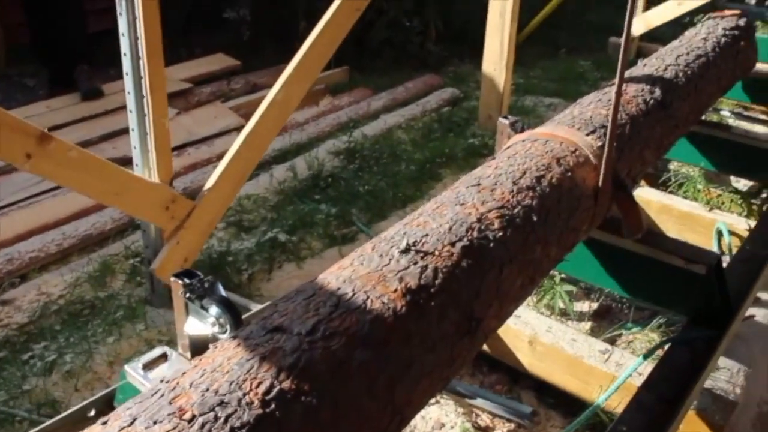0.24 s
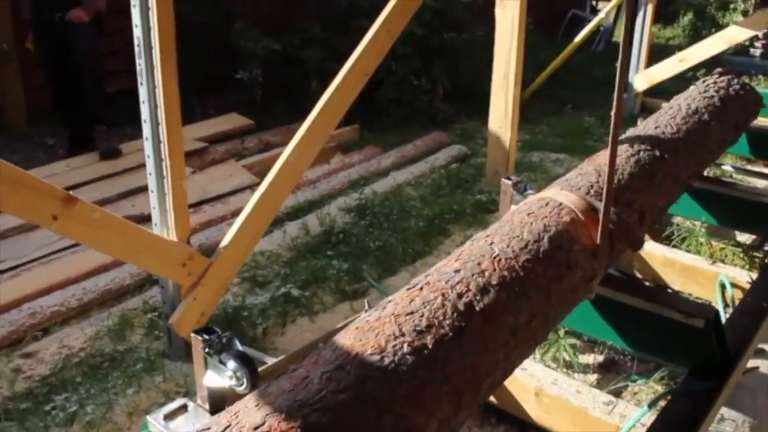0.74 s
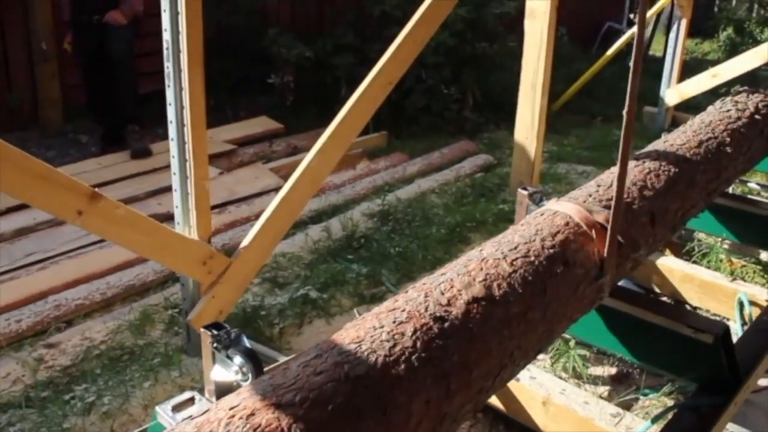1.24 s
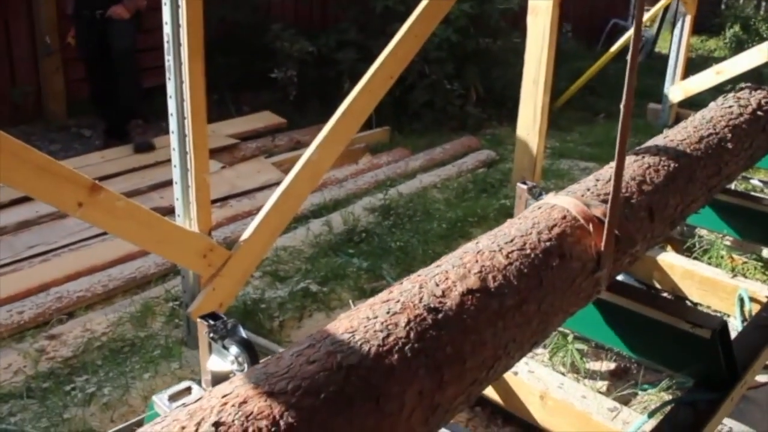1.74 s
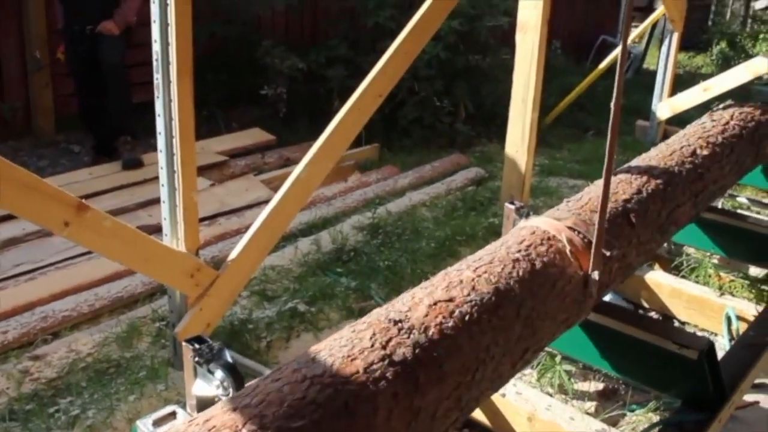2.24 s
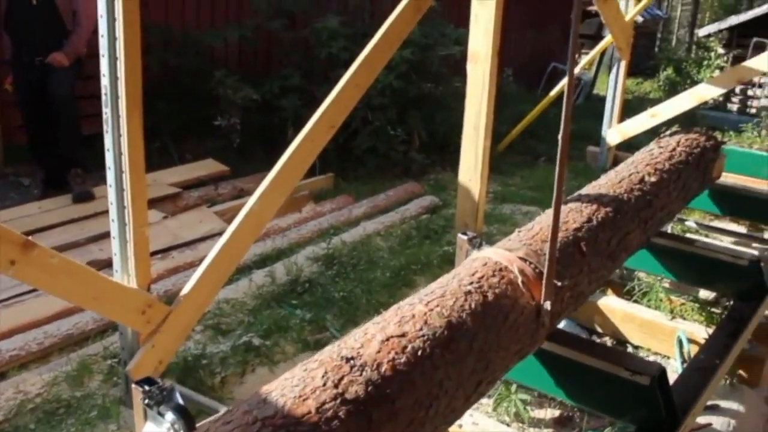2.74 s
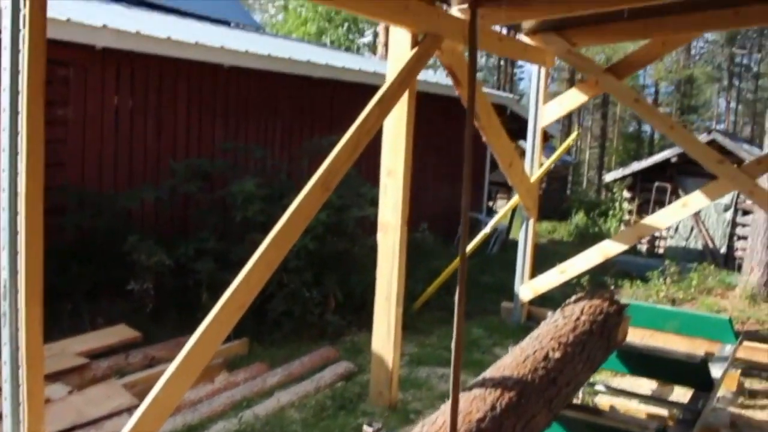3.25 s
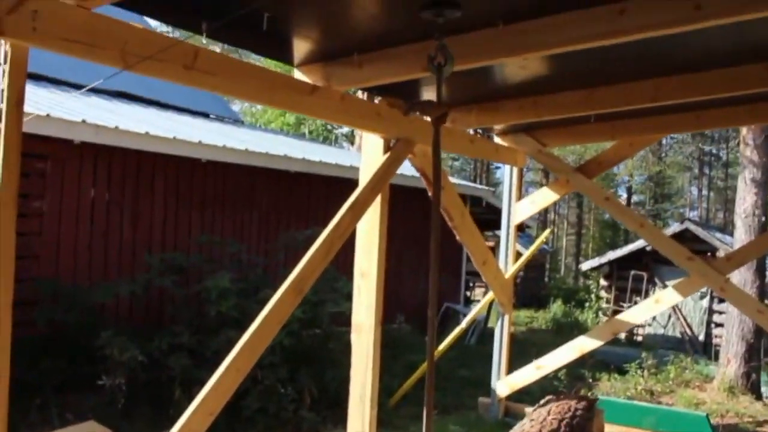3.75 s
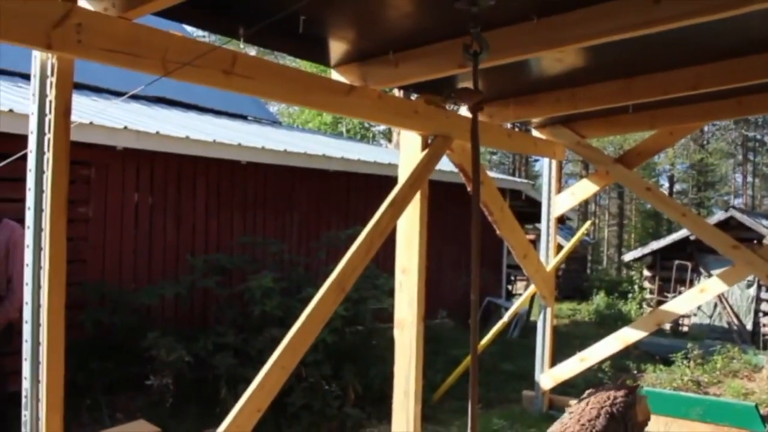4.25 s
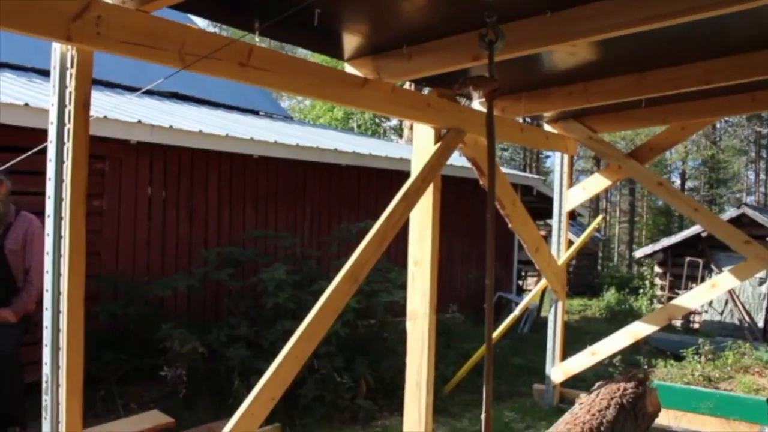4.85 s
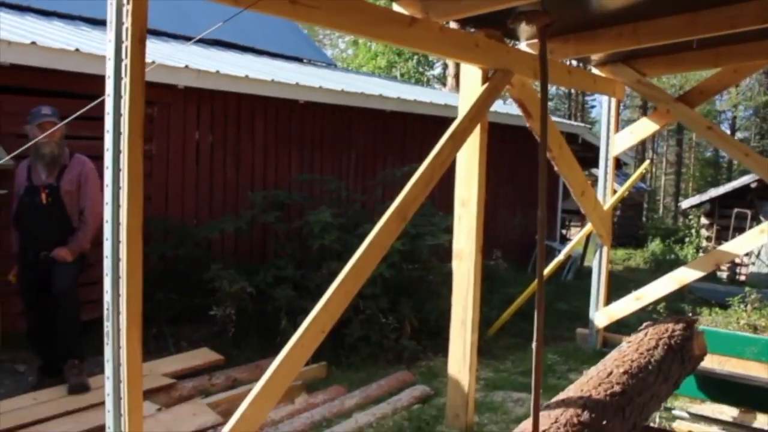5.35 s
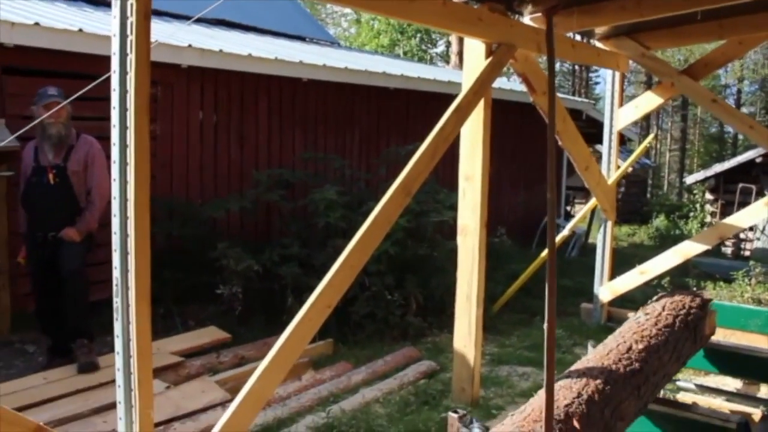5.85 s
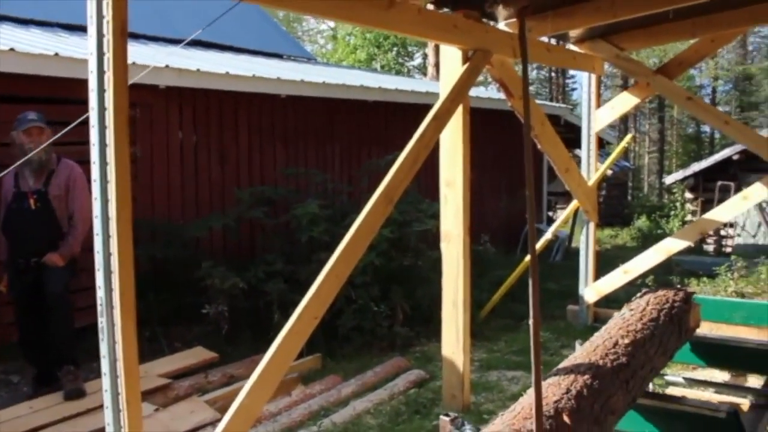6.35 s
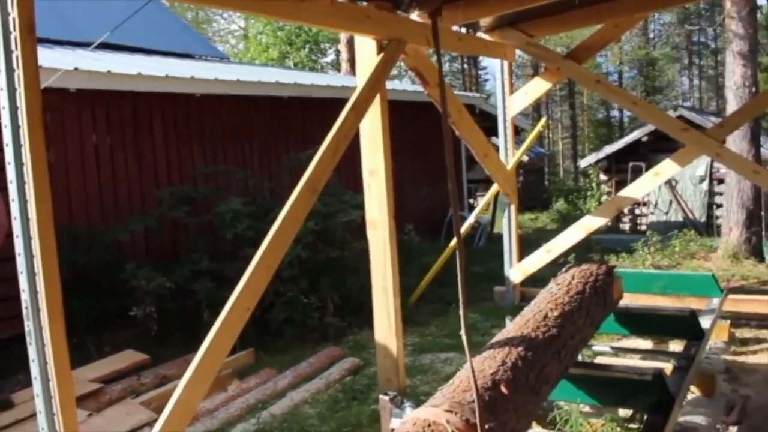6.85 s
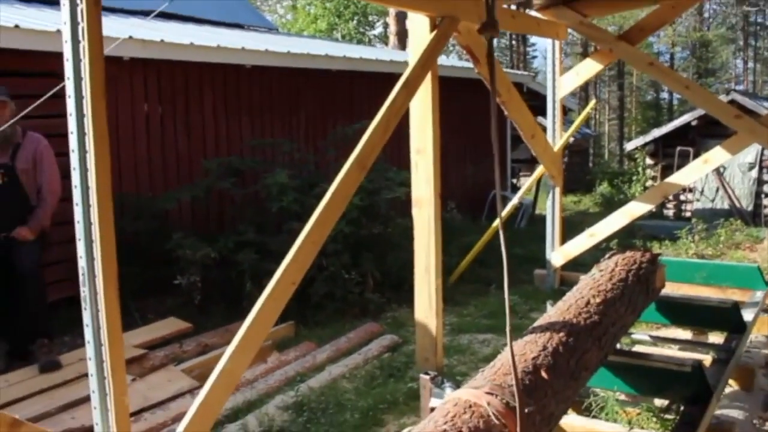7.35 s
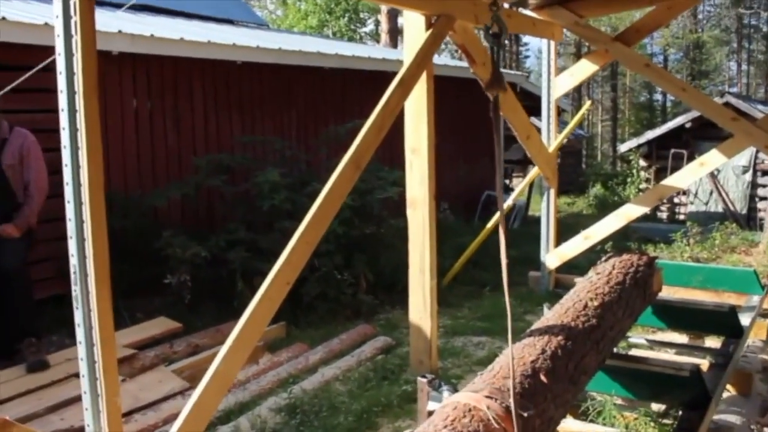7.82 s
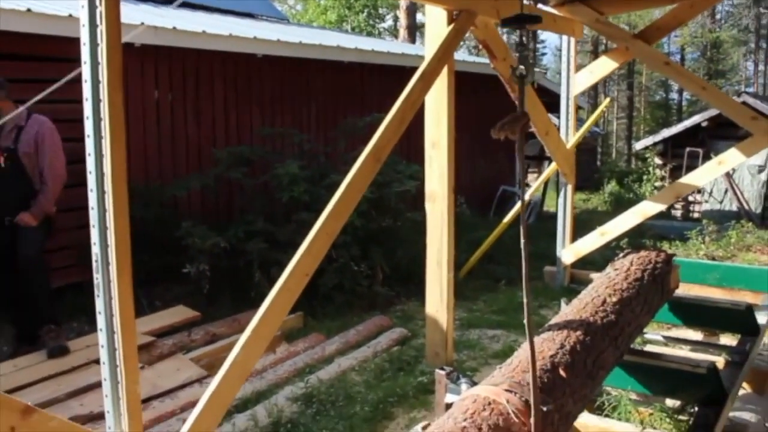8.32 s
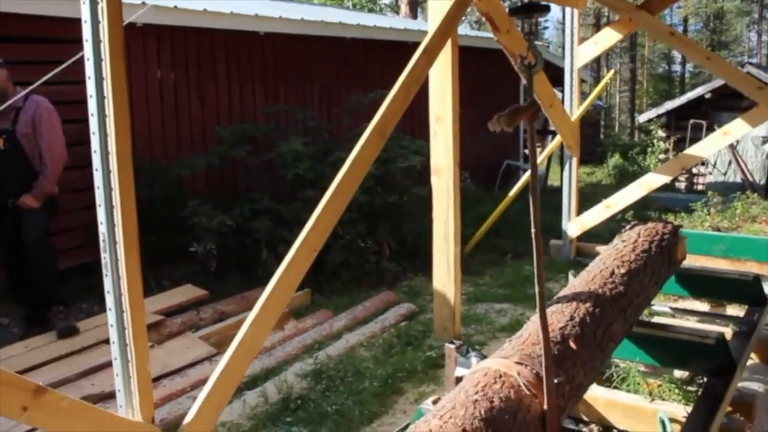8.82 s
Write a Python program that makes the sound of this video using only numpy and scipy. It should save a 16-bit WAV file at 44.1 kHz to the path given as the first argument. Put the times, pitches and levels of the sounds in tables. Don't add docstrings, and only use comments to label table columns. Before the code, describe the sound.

Outdoors under a timber shelter, an electric winch jerks on and off with groans and squeals, thumps a log over, then runs smoothly.

```python
import sys
import numpy as np
from scipy import signal
from scipy.fft import rfft, irfft, next_fast_len
from scipy.io import wavfile
from scipy.ndimage import uniform_filter1d, map_coordinates

SR = 44100
rng = np.random.default_rng(int(sys.argv[2]) if len(sys.argv) > 2 else 0)


def log_audio(samples):
    frames = np.atleast_2d(samples).T
    limited = np.clip(frames, -1, 1)
    pcm = np.round(limited * 32767).astype(np.int16)
    wavfile.write(sys.argv[1], SR, pcm)


def gain_from_decibels(decibels):
    exponent = np.asarray(decibels, float) / 20
    return 10 ** exponent


N = 400428
SPIN_UP_S = 0.0068


def winch():
    # (from [s], to [s], t60 [s], groan [dB], rumble [dB])
    strains = [(0.0, 0.28, .2, -56.5, -54), (0.3, 0.56, 1, -27, -34.5), (0.68, 0.86, 0.3, -24, -44.5),
               (0.95, 1.02, 0.13, -29, -37.5), (1.85, 2.02, 0.16, -21, -25), (2.15, 2.3, 0.67, -40, -45.5),
               (3.57, 3.63, 0.58, -24.5, -22.5), (3.82, 3.88, 0.36, -33, -32), (4.19, 4.34, 0.76, -34, -37),
               (4.44, 4.47, 0.68, -33, -29.5), (5.0, 5.08, 0.27, -35, -39), (5.08, 5.2, 0.52, -24.5, -37),
               (5.27, 5.4, 0.28, -24, -34.5), (5.85, 5.93, 1, -27, -32.5), (5.955, 6.03, 0.17, -23, -24),
               (6.06, 6.12, 0.1, -25, -28.5), (6.14, 6.18, 0.093, -30, -36), (6.18, 6.64, 0.79, -42, -39),
               (6.88, 8.62, 0.98, -57, -48)]
    groan, rumble = strokes(strains, attack_s=0.021)
    return gears(groan) + frame(groan, rumble) + gain_from_decibels(-11.5) * beam() + gain_from_decibels(2.0) * squeal() + singing()


def gears(groan):
    switch_on_s = [0.0, 0.29, 0.415, 1.8, 1.87, 1.97, 3.533, 3.6, 3.83, 4.167, 4.445, 4.997, 5.808, 6.875]
    # (off [s], coasting t60 [s], gear [dB], treble share [dB])
    runs = [(0.268, 0.083, -61, -7), (0.858, 0.52, -23.5, -10.5), (0.508, 0.23, -26, -16),
            (1.813, 0.25, -31, 10), (1.96, 0.41, -28, -37), (2.198, 0.59, -26.5, -3.5),
            (3.58, 0.087, -20, -12), (3.72, 0.97, -31, -15), (3.86, 0.14, -35, 0),
            (4.33, 0.17, -25.5, -5.5), (4.462, 0.35, -28, -10), (5.412, 0.32, -26.5, -8),
            (6.692, 0.27, -27, -2), (8.598, 0.43, -28, -2)]
    # (frequency [Hz], level [dB])
    whine = [(565, -51), (840, -43), (958, -46), (1199, -45), (1249, -48), (1702, -46), (2273, -48),
             (2406, -52), (2560, -49), (2848, -56), (4797, -57), (5313, -54), (685, -50), (1119, -46),
             (1325, -48), (1603, -48)]
    # (frequency [Hz], density [dB per Hz])
    mesh_spectrum = [(35, -78), (90, 1), (674, -10), (755, -37), (866, -30), (3000, -21), (3640, -21.5),
                     (5490, -23), (14000, -43)]
    # (frequency [Hz], width [Hz], level [dB])
    casing_modes = [(659, 45, 0.5), (883, 63, 6.5), (1180, 165, 4.5), (1395, 38, 8), (1570, 142, -0.5),
                    (2136, 162, -2), (2400, 286, -6), (2700, 130, -5.5), (3010, 76, -2.5), (3960, 100, -14),
                    (4310, 31, -9), (4540, 80, -22), (4710, 74, -9), (5360, 40, -15.5)]
    load_grind_db = -15
    slack_db, jolt_db = -33.5, 2.2

    rows = [(on, *run, db, db + treble_db) for on, (*run, db, treble_db) in zip(switch_on_s, runs)]
    gear, bright = strokes(rows, SPIN_UP_S)
    slack = 1 / (1 + groan / gain_from_decibels(slack_db))
    bright = bright * gain_from_decibels(jolt_db * (1.5 - slack) * wobble(22))
    teeth = grit(spread_db=3, clump_db=0.8, clump_rate=60)
    speed = 1 + 0.0015 * wobble(2.5)
    tones = unit(sum(gain_from_decibels(db + 1.2 * wobble(5)) * resonance(hz * speed, width=12 + hz / 90)
                     for hz, db in whine))
    mesh = coloured(grit(spread_db=3.0, clump_db=1.6, clump_rate=31), mesh_spectrum)
    casing = unit(filtered(teeth, ringing(casing_modes)))
    casing = casing + gain_from_decibels(-5) * patchy(mesh, depth_db=1.8) + gain_from_decibels(-3) * slack * tones
    casing = filtered(casing, lambda f: 1 / (1 + (f / 9900) ** 40) / (1 + (230 / (f + 1)) ** 4))
    treble = filtered(casing, lambda f: 1 / (1 + (2200 / (f + 1)) ** 4))
    body_gain = gear + gain_from_decibels(load_grind_db) * groan
    return gain_from_decibels(-3.5) * (body_gain * (casing - treble) + gain_from_decibels(5.5) * bright * treble)


def frame(groan, rumble):
    # (time [s], groan [Hz], unsteadiness [Hz])
    pitch = [(0, 245, 60), (.55, 270, 70), (.7, 250, 50), (.82, 292, 45), (1.0, 238, 60), (1.8, 265, 140),
             (2.5, 255, 120), (4.8, 245, 75), (5.0, 222, 28), (5.6, 221, 28), (5.8, 232, 130),
             (9.1, 262, 110)]
    # (frequency [Hz], density [dB per Hz])
    posts = [(30, -76), (60, -16), (95, 6), (135, 3), (161, 6.5), (190, -9.5), (260, -22), (500, -120)]
    t = np.arange(N) / SR
    s, hz, width = np.transpose(pitch)
    groan_hz = np.interp(t, s, hz) * (1 + 0.025 * wobble(9))
    unsteady = np.interp(t, s, width)
    timber = resonance(groan_hz, unsteady) + gain_from_decibels(-16) * resonance(2 * groan_hz, unsteady)
    shaking = coloured(rng.standard_normal(N) * gain_from_decibels(2.4 * wobble(25)), posts)
    return groan * timber + rumble * shaking


def beam():
    # (from [s], to [s], t60 [s], level [dB])
    loads = [
        (0.295, 1.0, .15, -27),
        (1.86, 2.2, 0.53, -22),
        (3.59, 3.61, 0.093, -4.5),
        (3.82, 3.86, 0.23, -22),
        (4.17, 4.36, 0.14, -17),
        (4.44, 4.48, 0.28, -27),
        (5.0, 5.25, 0.71, -28),
        (5.82, 6.1, 1.7, -30.5),
        (6.67, 6.69, 0.086, -19.5),
    ]
    return strokes(loads, SPIN_UP_S)[0] * resonance(np.full(N, 504.4), width=93)


def squeal():
    # (from [s], to [s], t60 [s], level [dB], frequency [Hz])
    slip_table = [
        (0.413, 0.424, 0.04, -18.5, 1016),
        (0.426, 0.453, 0.06, -15.5, 1015),
        (0.474, 0.51, 0.059, -24.5, 1048),
        (1.981, 2.05, 0.13, -27.5, 1014),
        (2.149, 2.205, 0.4, -30.5, 741),
        (4.2, 4.333, .05, -29, 1527),
        (5.89, 6.064, 0.11, -34.5, 1180),
        (6.18, 6.4, 0.11, -36, 1656),
    ]
    slips = np.array(slip_table)
    latest = np.maximum(np.searchsorted(slips[:, 0], np.arange(N) / SR) - 1, 0)
    slip_hz = slips[latest, -1]
    phase = 2 * np.pi * np.cumsum(slip_hz * (1 + 0.024 * wobble(160))) / SR
    chirp = gain_from_decibels(3.5 * wobble(45)) * np.sin(phase)
    chirp = chirp + gain_from_decibels(-9 + 4 * wobble(90)) * (slip_hz < 1100) * np.sin(1.52 * phase)
    return strokes(slips[:, :-1], SPIN_UP_S)[0] * chirp


def singing():
    # (from [s], to [s], level [dB], first frequency [Hz], last frequency [Hz])
    songs = [(0.3, 0.4, -36, 520, 530), (0.37, 0.53, -30, 1570, 1400), (0.65, 0.85, -33.5, 1400, 1400),
             (0.73, 0.82, -35, 1300, 1100), (0.87, 0.95, -37, 1600, 1590), (1.98, 2.07, -33, 1470, 1480),
             (1.98, 2.1, -40, 1380, 1600), (2.1, 2.2, -35, 520, 690), (4.19, 4.31, -32, 1540, 1600),
             (5.071, 5.191, -39, 1241, 1211), (5.201, 5.391, -38, 1261, 1231),
             (5.221, 5.381, -47, 1721, 1691), (5.041, 5.301, -54, 3731, 3716),
             (5.861, 6.081, -39, 1201, 1231), (5.831, 6.01, -47, 3081, 3071), (6.181, 6.621, -41, 886, 871),
             (6.181, 6.421, -43, 1391, 1381), (6.17, 6.4, -35.5, 1300, 1250), (6.12, 6.36, -50, 4900, 3700),
             (6.2, 6.45, -43, 2580, 2570), (6.33, 6.45, -48, 4100, 4000), (6.3, 6.45, -43, 1800, 2060),
             (8.2, 8.2, -57, 4331, 4800), (3.68, 3.74, -30, 1850, 2150), (3.64, 3.72, -34, 2600, 2700),
             (2.07, 2.18, -34, 2950, 3050)]
    rise_s, t60_s = 0.017, 0.1
    out = np.zeros(N)
    for start, stop, db, first_hz, last_hz in songs:
        t = np.arange(round(start * SR), round((stop + t60_s) * SR))
        hz = np.interp(t / SR, [start, stop], [first_hz, last_hz])
        phase = np.cumsum(2 * np.pi * hz / SR + rng.normal(0, 0.035, len(t)))
        gain = strokes([(start, stop, t60_s, db)], rise_s)[0][t] * gain_from_decibels(2.5 * wobble(25)[t])
        out[t] += gain * np.sin(phase)
    return np.sqrt(2) * out


def clacks():
    # (time
    # [s], peak [dB], low ring [Hz], high ring [Hz], treble [dB])
    pull_ins = [(0.288, -12, 2020, 5300, -8.5), (0.419, -16, 1480, 4020, -14),
                (0.639, -8.5, 910, 2650, -32), (0.835, -22, 1280, 5650, -6.5), (0.857, -21, 1870, 3630, -8),
                (0.959, -22.5, 890, 4580, -1.5), (1.801, -12.5, 1960, 2740, -10),
                (1.809, -9.5, 1240, 2680, -14), (3.533, -11.5, 855, 3670, -7),
                (3.827, -21.5, 1066, 4300, -4.5), (4.44, -20, 990, 4310, -4),
                (4.164, -7, 1810, 3870, -11.5), (4.318, -7.5, 1873, 3630, -14.5),
                (4.328, -9.5, 1057, 3040, -25), (4.993, -12, 1836, 3960, -9.5), (5.803, -13, 815, 3140, -6),
                (6.869, -23, 883, 4870, -1)]
    # (time [s], peak [dB], low ring [Hz], high ring [Hz], treble [dB])
    releases = [
        (0.867, -9.5, 1590, 3785, -4),
        (5.401, -10.5, 868, 4110, -7.5),
        (6.676, -12, 1165, 3960, -5.5),
        (8.59, -13.5, 1074, 3675, -1.5),
    ]
    # (level [dB], bright t60 [s], dull t60 [s], top [Hz])
    rasps = [(-5, 0.1, 0.08, 18000), (-8.5, 0.024, 0.13, 12000)]
    # (frequency [Hz], level [dB])
    crack_spectrum = [(180, -38), (420, -43), (1040, -7.5), (1810, -11.5), (3700, -9.5), (4370, -9),
                      (8640, -16), (13300, -21), (16000, -90)]
    # (frequency [Hz], level [dB], t60 [s])
    bracket = [(534, -12, 0.3), (892, -10, 0.15), (1341, -8, 0.5), (2920, -4, 0.2), (3550, -2, 0.09),
               (3900, 0, 0.1), (4500, -3, 0.15)]
    # (pitch ratio [1], level [dB])
    cluster = [(.86, -7), (1, 2.5), (1.13, -5.5), (1.29, -9)]
    rattle_s = 0.008
    lead = 500

    def ring(hz, t60):
        drift = np.cumsum(rng.normal(0, 0.03 + hz / 40000, len(t)))
        return np.sin(2 * np.pi * hz * t + drift) * gain_from_decibels(-60 * t / t60)

    def ring_cluster(hz, t60):
        return sum(gain_from_decibels(level + rng.normal(0, 2.3)) * ring(ratio * hz, t60) for ratio, level in cluster)

    out, t = np.zeros((2, N + SR)), np.arange(SR // 3) / SR
    after = t - lead / SR
    cracks = coloured(rng.standard_normal(N), crack_spectrum)
    dull = filtered(cracks, lambda f: 1 / (1 + (f / 5500) ** 4))
    for rows, (rasp_db, bright_t60, dull_t60, top_hz) in zip([pull_ins, releases], rasps):
        swell = np.where(after < 0, gain_from_decibels(5.0 + 4400 * after), gain_from_decibels(4.5 - 60 * after / bright_t60))
        hang = (after > 0) * gain_from_decibels(4.0 - 60 * after / dull_t60)
        lowpass = signal.butter(2, top_hz, fs=SR, output="sos")
        for s, db, low_hz, high_hz, treble_db in rows:
            blows, late = np.zeros(SR // 20), rng.random(size=24) * 3 * rattle_s
            blows[lead + (late * SR).astype(int)] = rng.normal(0, 1, size=24) * np.exp(-late / rattle_s)
            blows = 1.05 * blows / np.linalg.norm(blows)
            steel = sum(gain_from_decibels(level + rng.normal(0, 1.4) + treble_db * (hz > 2300)) * ring(hz, 1.06 * t60)
                        for hz, level, t60 in bracket)
            body = gain_from_decibels(-7) * ring_cluster(low_hz, 0.055) + gain_from_decibels(-18.0) * steel
            body = body + gain_from_decibels(treble_db + 3.5) * ring_cluster(high_hz, 0.028)
            start = round(s * SR) - lead
            here = slice(start, start + len(t))
            rasp = signal.sosfilt(lowpass, cracks[here]) * swell + dull[here] * hang
            hit = signal.fftconvolve(body, blows)[:len(t)] + gain_from_decibels(treble_db + rasp_db) * rasp
            pan_db = 13.5 + 0.8 * treble_db
            out[:, here] += gain_from_decibels(db + pan_db * np.array([[0.5], [-0.5]])) * hit
    return filtered(out[:, :N], lambda f: 1 / (1 + 1j * f / 12000) ** 2)


def thuds():
    # (time [s], peak [dB], frequency [Hz], t60 [s])
    landings = [
        (1.854, 9, 432, 0.057),
        (3.588, 7.5, 488, 0.039),
    ]
    # (pitch ratio [1], level [dB], t60 ratio [1])
    log_modes = [(.3, -30, 3.3), (.44, -9.5, 3), (.58, -7, 2.8), (.78, -11, 1.9), (1.02, 10, 0.49),
                 (1.45, -3, 0.57), (2.3, -4, 0.8)]
    out, t = np.zeros(N + 2 * SR), np.arange(SR) / SR
    band = signal.butter(3, [500, 2100], "band", fs=SR)
    for s, db, hz, t60 in landings:
        wave = 0.43 * sum(gain_from_decibels(level - 60 * t / (longer * t60)) * np.sin(2 * np.pi * ratio * hz * t)
                          for ratio, level, longer in log_modes)
        slap = 0.3 * unit(signal.lfilter(*band, rng.standard_normal(SR))) * gain_from_decibels(-60 * t / t60)
        onset = 1 - np.exp(-t / 0.00052)
        out[round(s * SR):][:SR] += gain_from_decibels(db - 7.5) * (wave + 1.64 * slap) * onset
    return out[:N]


def bark():
    # (from [s], to [s], t60 [s], level [dB], edge [dB])
    drags = [(0.623, 0.644, 0.073, -28, 1.5), (0.825, 0.834, .06, -46, 10), (1.936, 2.054, 0.17, -59, 10.5),
             (2.02, 2.086, 0.15, -26.5, 0), (2.064, 2.104, 0.11, -18.5, -11.5),
             (2.109, 2.143, 0.11, -21, -11), (2.148, 2.188, 0.082, -21.5, -11.5),
             (3.568, 3.584, 0.013, -24, -3), (3.64, 3.686, 0.09, -24.5, -5.5),
             (3.676, 3.721, 0.21, -22.5, -9), (0.406, 0.528, 0.19, -48.5, 3), (0.3, 0.86, .1, -60.5, 11.5),
             (4.17, 4.32, 0.13, -58, 12.5), (5.266, 5.284, 0.062, -52, 4), (5.34, 5.365, .06, -51, 6),
             (5.955, 5.984, .07, -42, -1), (6.057, 6.076, .07, -42, -5), (6.19, 6.231, .1, -42.5, -5),
             (6.353, 6.4, 0.13, -45, -7), (4.331, 4.35, 0.18, -24, -10), (7.547, 7.556, .03, -45, 12),
             (6.864, 6.875, .05, -45, 14), (8.372, 8.394, 0.045, -44, -6), (8.722, 8.733, .02, -75, 14)]
    # (frequency [Hz], level [dB])
    rub_spectrum = [(240, -59), (400, -57), (518, -14.5), (866, -18), (1600, -7.5), (3100, -2.5),
                    (6200, -7.5), (9750, -34.5), (16500, -120)]
    # (frequency [Hz], level [dB])
    edge_spectrum = [(3820, -4.5), (7500, -8), (11400, -6), (12700, -17), (14000, -13), (16000, -43)]
    # (frequency [Hz], width [Hz], level [dB])
    bed_modes = [(2010, 100, -2), (3030, 62, 13.5), (3840, 230, -2), (4300, 67, 3), (5350, 250, -8),
                 (6640, 160, -15)]
    level, edge = strokes([(*drag, db, db + edge_db) for *drag, db, edge_db in drags], attack_s=0.017)
    grains = patchy(grit(spread_db=2.2, clump_db=1.2, clump_rate=90), depth_db=3.5, size=22)
    rub = coloured(grains, rub_spectrum) + 0.84 * unit(filtered(grains, ringing(bed_modes)))
    return level * unit(rub) + edge * coloured(grains, edge_spectrum)


def rails():
    # (time [s], frequency [Hz], level [dB], t60 [s])
    rings = [(0.867, 3836, -17, 0.12), (2.201, 815, -46, 2.3), (2.201, 645, -35.5, 0.9),
             (3.83, 4255, -36, 0.21), (4.451, 4240, -29, 0.21), (4.441, 896, -26, 0.3),
             (4.451, 644, -40, 1.35), (3.832, 890, -30, .25), (5.402, 3830, -23, 0.14),
             (5.401, 4260, -20, 0.07), (5.401, 3660, -15, 0.05), (5.401, 4400, -13, 0.045),
             (5.411, 1345, -48, 1.2), (6.69, 3850, -32, 0.2), (6.69, 4150, -33, .16),
             (6.872, 4850, -26, .1), (8.595, 3750, -30, .3), (8.595, 3000, -30, .25),
             (8.59, 8420, -23, .06), (8.592, 8570, -24, .06)]
    out, t = np.zeros(N + 2 * SR), np.arange(SR) / SR
    for s, hz, db, t60 in rings:
        drift = np.cumsum(rng.normal(0, min(hz, 4300) ** 2 / 1.1e8, SR))
        tone = np.sin(2 * np.pi * hz * t + drift) * (1 - np.exp(-t / 0.00075))
        out[round(s * SR):][:SR] += gain_from_decibels(db - 60 * t / t60) * tone
    return out[:N]


def clunks():
    # (from [s], to [s], level [dB])
    rattles = [
        (3.83, 3.862, -25),
        (4.445, 4.48, -23),
        (5.95, 5.985, -28),
        (6.065, 6.1, -30.5),
        (0.962, 0.986, -27),
    ]
    # (frequency [Hz], width [Hz], level [dB])
    hook_modes = [(890, 93, 3.5), (1070, 110, -4), (1370, 180, -10.5)]
    # (frequency [Hz], width [Hz], level [dB])
    plank_modes = [(490, 110, -1.5), (650, 140, -1), (774, 150, -5.5)]
    bounces = grit(spread_db=4, clump_db=3, clump_rate=150)
    hook_rows = [(start, start + 0.43 * (stop - start), 0.1, db) for start, stop, db in rattles]
    plank_rows = [(start, stop, 0.1, db + 0.5) for start, stop, db in rattles]
    hook = strokes(hook_rows, 0.0026)[0] * unit(filtered(bounces, ringing(hook_modes)))
    plank = strokes(plank_rows, 0.011)[0] * unit(filtered(bounces, ringing(plank_modes)))
    return hook + plank


def ticks():
    # (time [s], peak [dB], frequency [Hz], snap [dB])
    tick_table = [(0.084, -14.5, 1260, -43), (0.0875, -17, 1320, -36), (0.123, -21, 950, -37),
                  (0.138, -15.5, 890, -58), (0.1565, -15, 880, -55), (0.1955, -14, 1190, -35),
                  (0.2135, -14, 890, -48), (0.2305, -15, 950, -51), (0.2465, -17.5, 1150, -50),
                  (1.12, -17, 900, -60), (1.124, -21, 620, -54), (1.145, -18, 1010, -54),
                  (2.533, -22, 1410, -42), (4.589, -20, 638, -60), (8.976, -20, 700, -63),
                  (9.05, -23, 700, -64), (9.058, -16.5, 850, -64), (6.79, -21, 1500, -50),
                  (7.0928, 1.5, 2080, -28), (7.0945, -4.5, 1100, -32), (7.5552, 1, 2360, -19),
                  (7.7972, -1, 980, -51)]
    # (pitch ratio [1], level [dB], t60 [s])
    knock_modes = [(.4, -6.5, 0.032), (1, 1, .016), (1.38, -1.5, 0.014)]
    out, t = np.zeros(N + 2 * SR), np.arange(SR) / SR
    band = signal.butter(4, [2200, 6500], "band", fs=SR)
    for s, db, hz, snap_db in tick_table:
        snap = gain_from_decibels(snap_db + 10.0 - 60 * t / 0.01) * signal.lfilter(*band, rng.standard_normal(SR))
        knock = sum(gain_from_decibels(level - 60 * t / t60) * np.sin(2 * np.pi * ratio * hz * t)
                    for ratio, level, t60 in knock_modes)
        knock = knock * (1 - np.exp(-t / 0.00035))
        rebound = np.roll(knock, round(rng.uniform(0.00308, 0.008) * SR))
        out[round(s * SR):][:SR] += gain_from_decibels(db - 14.0) * (knock + gain_from_decibels(-5.5) * rebound) + snap
    return out[:N]


def shelter(x):
    # (frequency [Hz], t60 [s])
    decay = [(150, 0.35), (1000, 0.26), (4000, 0.33), (12000, 0.1)]
    hz, t, z = signal.stft(rng.standard_normal((2, SR // 2)), SR, nperseg=256)
    tail = signal.istft(z * gain_from_decibels(-60 * t / along(decay, hz)[:, None]), SR, nperseg=256)[1]
    tail = 1.2 * tail[:1] + 0.31 * tail
    late = np.pad(x, (500, 0))[None]
    return signal.fftconvolve(late, tail / np.linalg.norm(tail[0]), axes=1)[:, :N]


def engine():
    # (time [s], level [dB])
    idle = [
        (2.0, -61),
        (2.4, -48.5),
        (3.0, -49),
        (3.5, -51.5),
        (4.2, -45),
        (5.0, -54),
    ]
    # (frequency [Hz], level [dB])
    exhaust = [(40, -40), (72, -4), (86, 9), (108, -1), (140, -7), (158, 3), (190, -12), (500, -70)]
    firing_hz, rough_db = 14.3, -7
    turns = np.cumsum(firing_hz * (1 + 0.004 * wobble(3))) / SR
    firings = np.diff(np.floor(turns), prepend=0)
    tone = coloured(firings, exhaust) + gain_from_decibels(rough_db) * coloured(rng.standard_normal(N), exhaust)
    t = np.arange(N) / SR
    s, db = np.transpose(idle)
    audible = np.abs(uniform_filter1d(1.0 * ((t >= s[0]) & (t <= s[-1])), size=180))
    return gain_from_decibels(np.interp(t, s, db)) * audible * tone


def air():
    # (frequency [Hz], level [dB])
    spectrum = [(12, -35), (20, -2), (90, -5.5), (187, -5.5), (472, -7.5), (1090, -11), (1440, -14),
                (3250, -16), (11800, -30.5), (16000, -30)]
    # (frequency [Hz], correlation [1])
    likeness = [(60, -0.11), (240, 0.67), (950, 0.036), (3770, -0.084), (15000, -0.74)]
    return gain_from_decibels(-47) * spread(coloured(rng.standard_normal(N), spectrum), likeness)


def unit(x):
    return x / np.sqrt(np.mean(x ** 2) + 1e-20)


def along(points, hz):
    f, v = np.transpose(points)
    return np.interp(np.log(hz + 1), np.log(f + 1), v)


def wobble(rate):
    place = np.cumsum(rate * np.ones(N)) / SR
    return map_coordinates(rng.standard_normal(4000), [place])


def filtered(x, response):
    m = next_fast_len(N + SR // 2)
    return irfft(rfft(x, m) * response(np.fft.rfftfreq(m, 1 / SR)), m)[..., :N]


def coloured(x, spectrum):
    return unit(filtered(x, lambda hz: gain_from_decibels(along(spectrum, hz))))


def grit(spread_db, clump_db, clump_rate):
    uneven_db = spread_db * np.minimum(rng.exponential(size=N), 4)
    sizes = gain_from_decibels(uneven_db + clump_db * wobble(clump_rate))
    return unit(sizes * rng.standard_normal(N))


def resonance(hz, width):
    phase = 2 * np.pi * np.cumsum(hz) / SR
    return unit(wobble(width) * np.cos(phase) + wobble(width) * np.sin(phase))


def ringing(modes):
    return lambda f: sum((-1) ** k * gain_from_decibels(db) * 1j * f * w / (c * c - f * f + 1j * f * w)
                         for k, (c, w, db) in enumerate(modes))


def patchy(x, depth_db, size=7):
    z = signal.stft(x, nperseg=256)[2]
    field = uniform_filter1d(rng.standard_normal(z.shape), size=3, axis=0)
    field = uniform_filter1d(field, size=size, axis=1)
    return unit(signal.istft(z * gain_from_decibels(depth_db * unit(field)), nperseg=256)[1][:N])


def strokes(rows, attack_s):
    out = np.zeros((len(rows[0]) - 3, N))
    for start, stop, t60, *db in rows:
        t = np.arange(round(start * SR), min(N, round((stop + 2 * t60) * SR)))
        attack = np.minimum((t / SR - start) / attack_s, 1)
        release = gain_from_decibels(-60 * np.maximum(t / SR - stop, 0) / t60)
        out[:, t] += gain_from_decibels(db)[:, None] * attack * release
    return out


def spread(x, alike):
    z = signal.stft(x, nperseg=256)[2]
    field = uniform_filter1d(rng.standard_normal(z.shape), size=9, axis=1)
    other = 1.2 * signal.istft(z * np.exp(2j * unit(field)), nperseg=256)[1][:N]

    def mid_side(hz):
        turn = np.arccos(np.clip(along(alike, hz), -1, 1)) / 2
        return np.array([np.cos(turn), np.sin(turn)])

    mid, side = filtered(np.array([x, other]), mid_side)
    return np.array([mid + side, mid - side])


def scene():
    # (frequency [Hz], correlation [1])
    likeness = [(60, 0.95), (180, 0.93), (550, 0.98), (1650, 0.7), (4970, 0.48), (15000, 0.88)]
    lag_s = 3.3e-5
    blows = clacks()
    blows_mono = blows.mean(axis=0)
    machine = winch() + thuds() + bark() + rails() + clunks() + ticks()
    direct = spread(machine, likeness) + 0.16 * blows + 0.93 * spread(blows_mono, likeness)
    direct = filtered(direct, lambda f: (1j * f / (55 + 1j * f)) ** 2)
    direct[1] = filtered(direct[1], lambda f: np.exp(-2j * np.pi * f * lag_s))
    return direct + gain_from_decibels(-14.5) * shelter(machine + blows_mono) + engine() + air()


def top_cut(x):
    return signal.sosfilt(signal.butter(12, 16460, fs=SR, output="sos"), x)


def record(dry):
    x = dry / (1 + np.abs(dry) ** 6) ** (1 / 6)
    hz, _, z = signal.stft(x, SR, nperseg=1024)
    hz = hz[:, None]
    power = np.abs(z) ** 2
    total = power.sum(axis=1, keepdims=True)
    luck = uniform_filter1d(rng.standard_normal(z.shape), size=18, axis=1)
    luck = unit(uniform_filter1d(luck, size=3, axis=2))
    mask_db = -46 - hz / 1800 - 5 * luck - 6 * (hz < 10000)
    heard = uniform_filter1d(power, size=12, axis=1) > gain_from_decibels(2 * mask_db) * total
    heard = heard | (total < gain_from_decibels(2 * -44))
    keep = (heard | (hz < 8600)) & (hz < 16100)
    mix = signal.istft(z * keep, nperseg=1024)[1][:, :N]
    return top_cut(mix)


dry = scene()
out = record(dry)
log_audio(out)
```